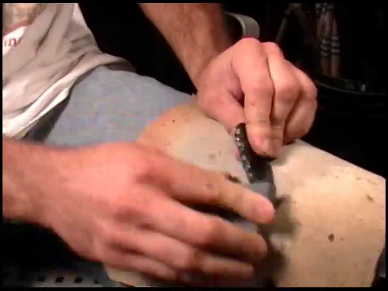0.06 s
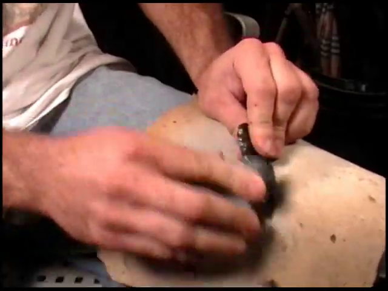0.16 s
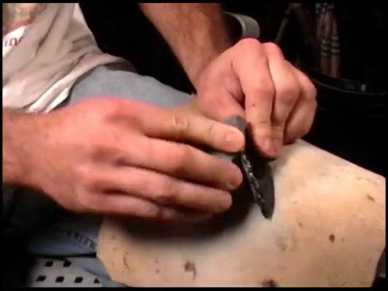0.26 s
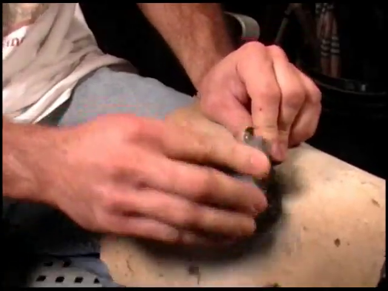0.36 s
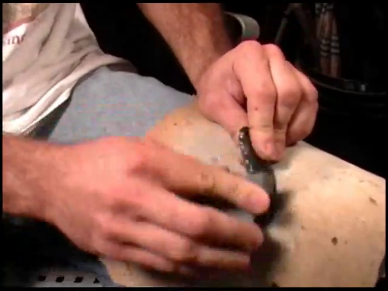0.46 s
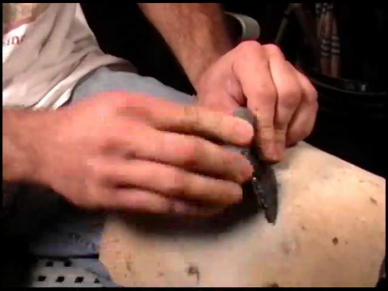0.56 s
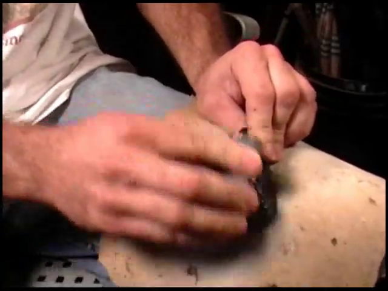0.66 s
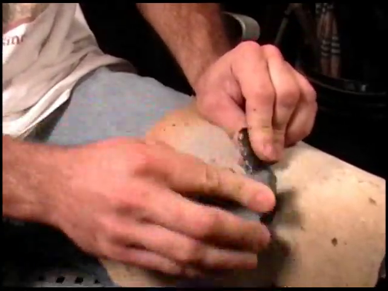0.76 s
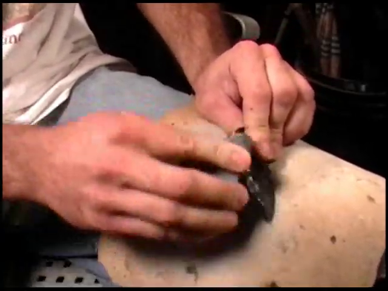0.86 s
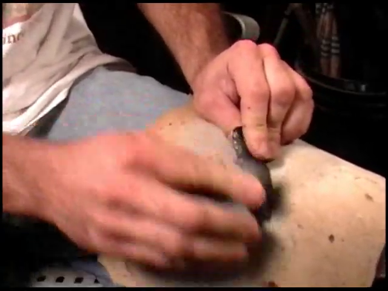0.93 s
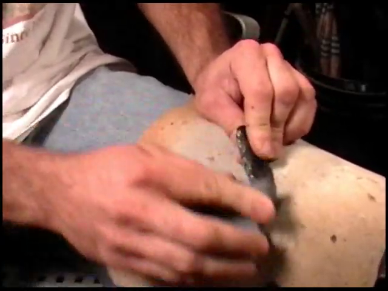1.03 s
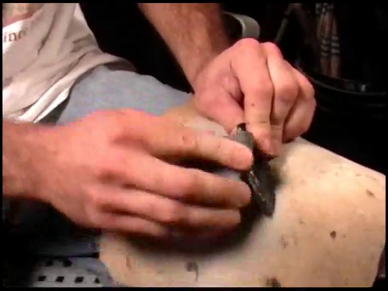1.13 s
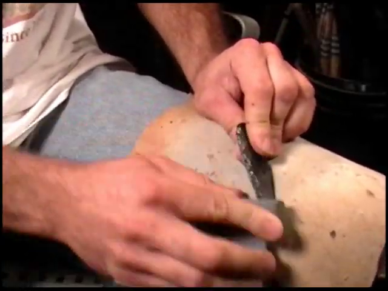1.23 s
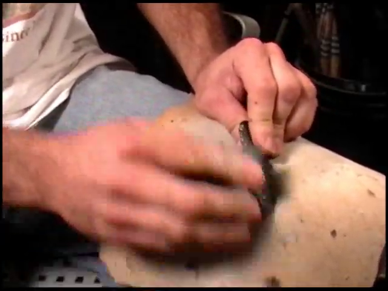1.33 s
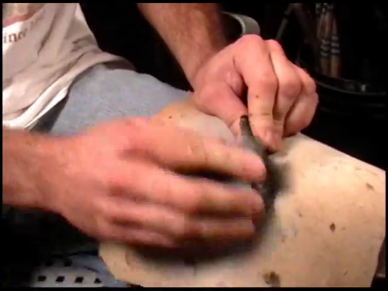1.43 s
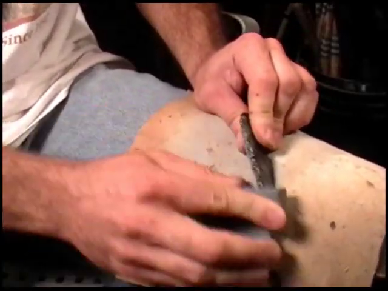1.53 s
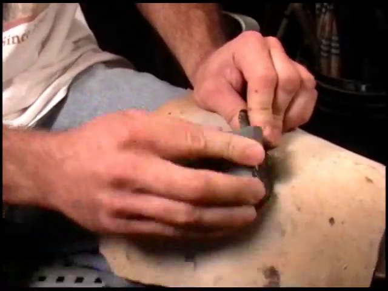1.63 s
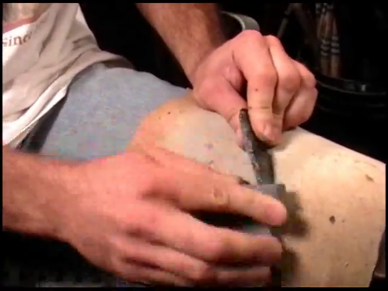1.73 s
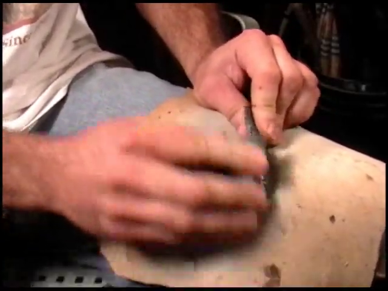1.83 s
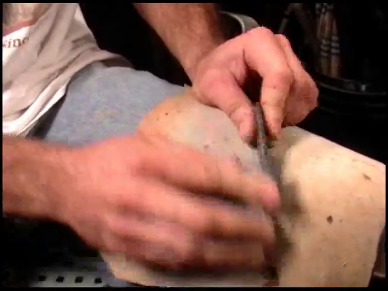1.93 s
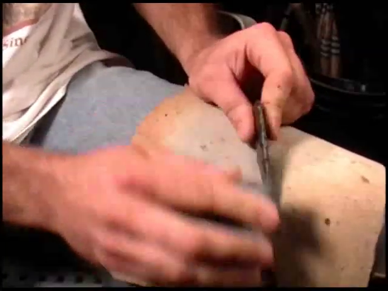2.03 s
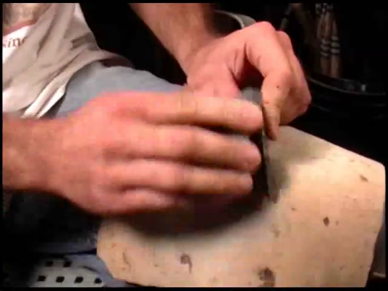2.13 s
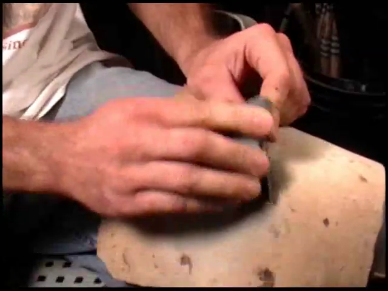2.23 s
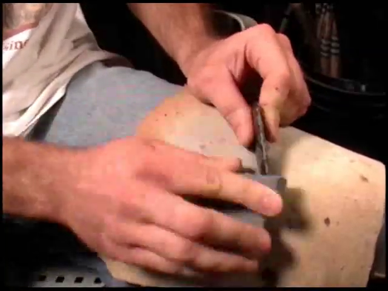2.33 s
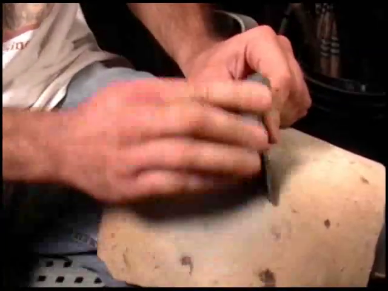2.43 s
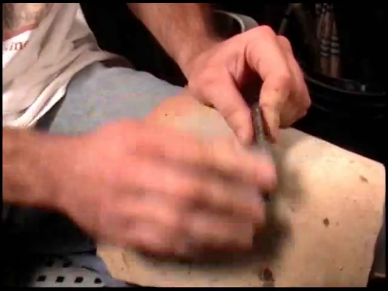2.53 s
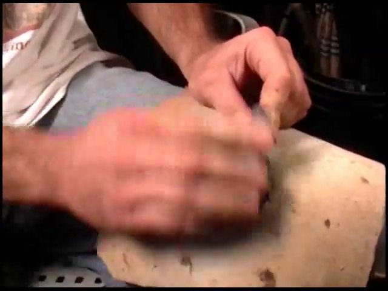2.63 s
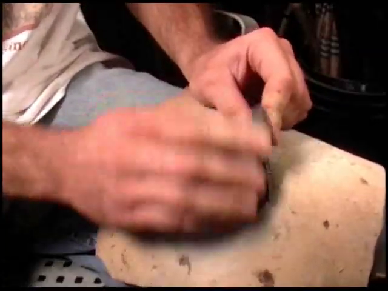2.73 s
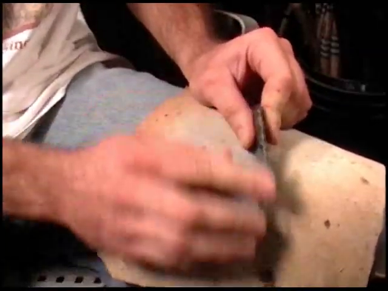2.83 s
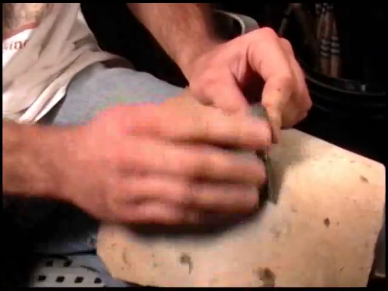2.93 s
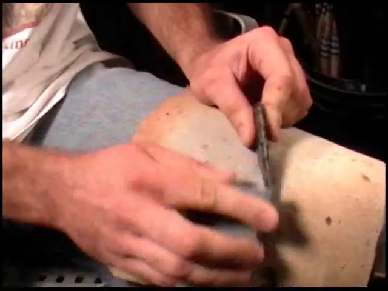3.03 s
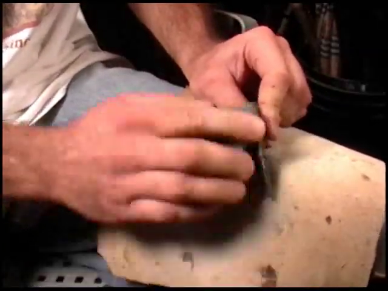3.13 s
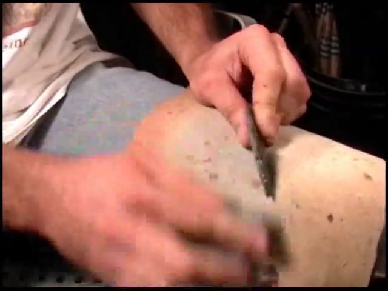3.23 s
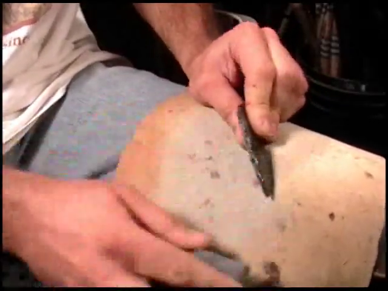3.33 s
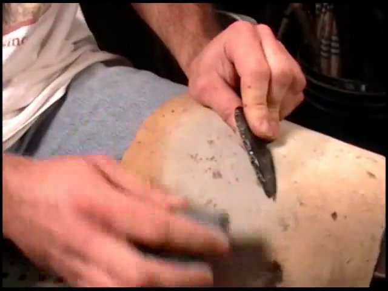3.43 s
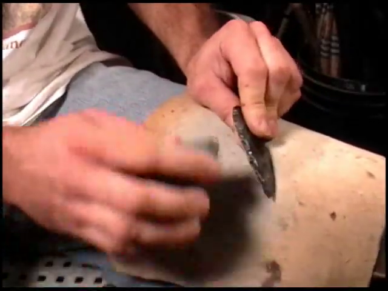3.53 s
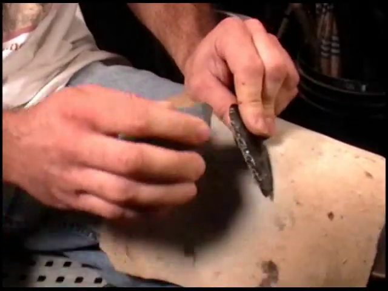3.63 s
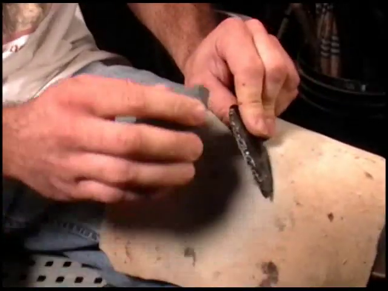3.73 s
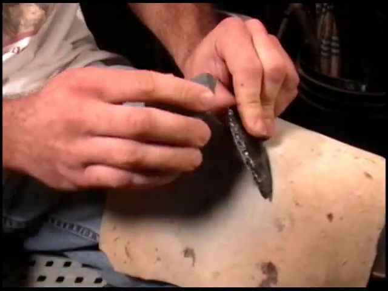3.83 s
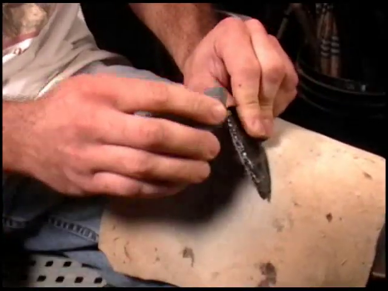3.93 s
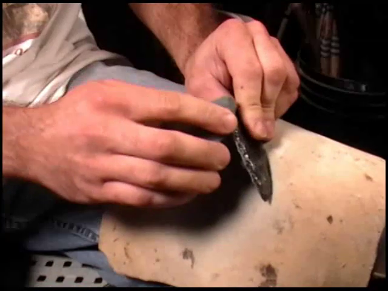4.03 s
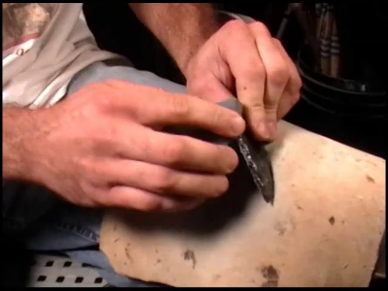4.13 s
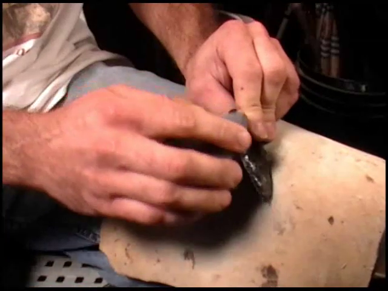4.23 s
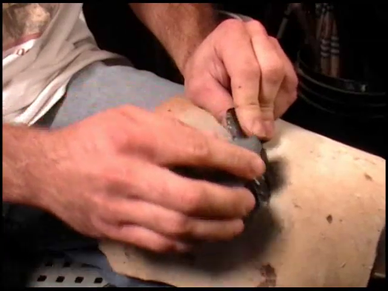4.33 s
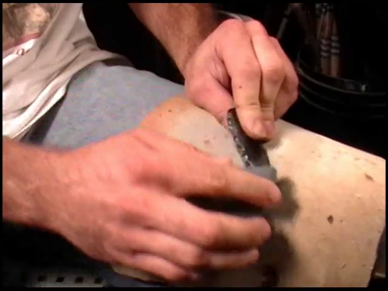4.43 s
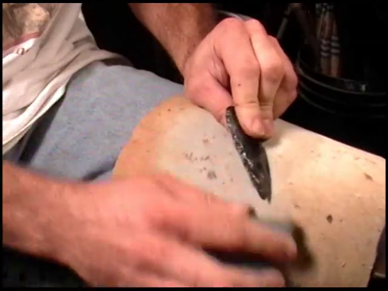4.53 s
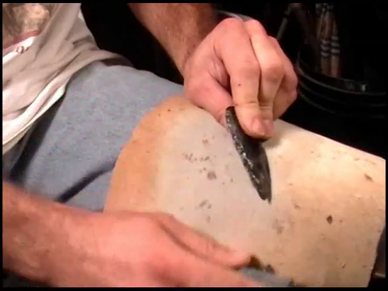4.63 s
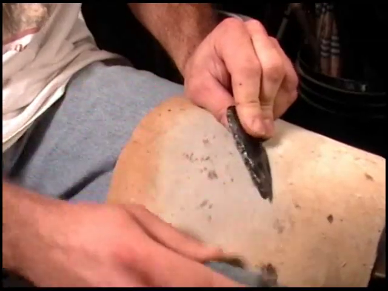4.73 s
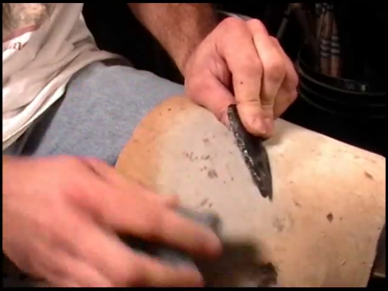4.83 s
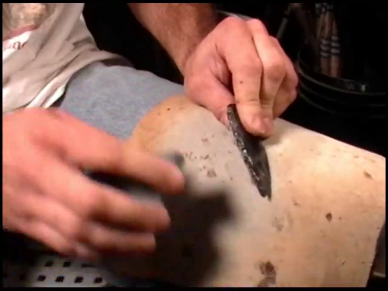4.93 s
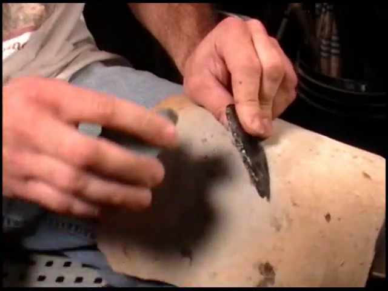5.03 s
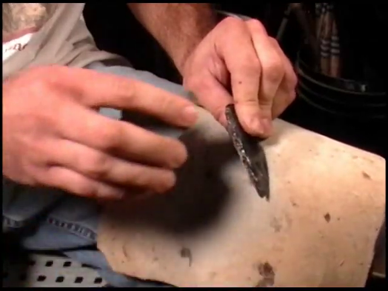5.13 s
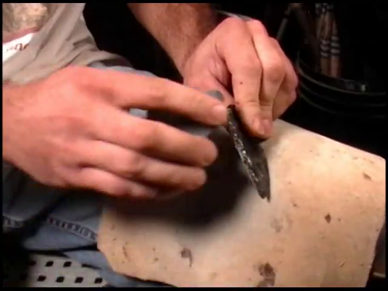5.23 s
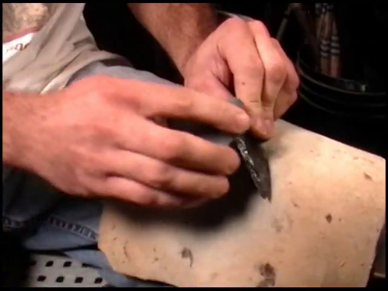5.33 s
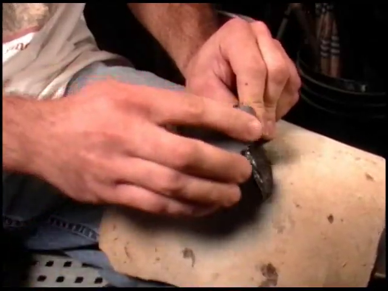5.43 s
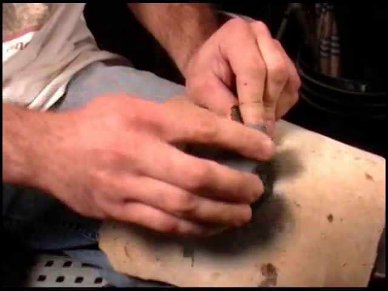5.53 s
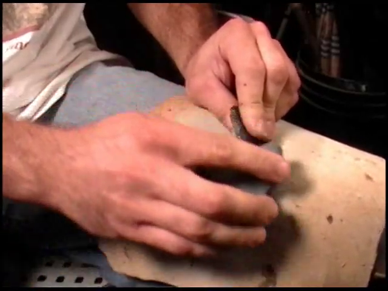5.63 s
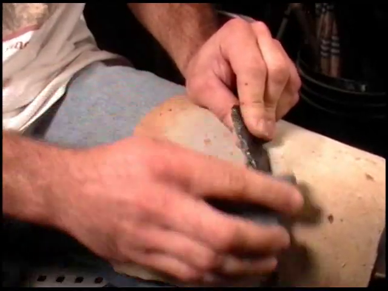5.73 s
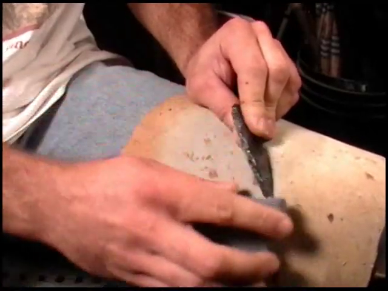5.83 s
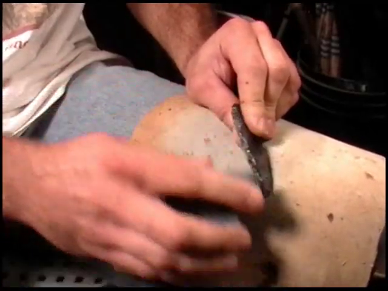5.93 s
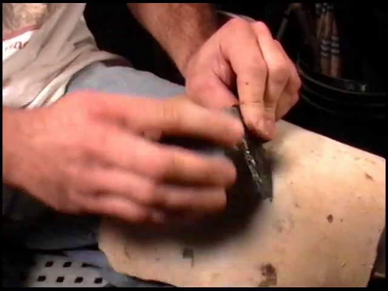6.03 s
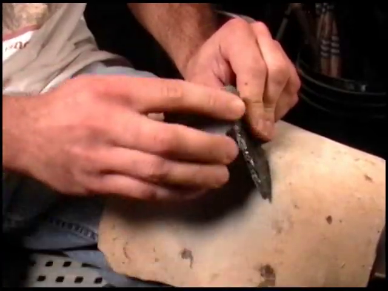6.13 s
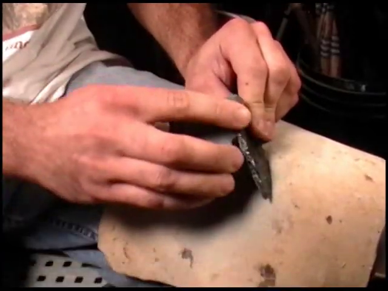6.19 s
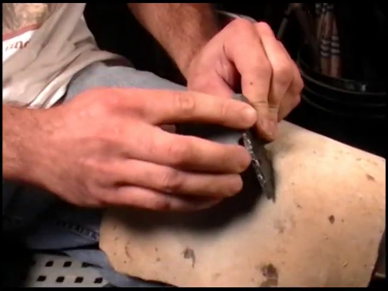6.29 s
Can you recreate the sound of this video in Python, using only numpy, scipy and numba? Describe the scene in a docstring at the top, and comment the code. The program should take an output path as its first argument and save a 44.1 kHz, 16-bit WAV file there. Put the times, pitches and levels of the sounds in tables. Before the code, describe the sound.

Close, raspy rubbing of stone on a thin stone edge, with light clicks and crunches over a faint ventilation hum.

```python
"""Abrading a stone flake

An abrader stone rubs the edge of a hand-held flake: quick back-and-forth strokes, five brisk one-way
swipes, then two slow drags. Grit catches on the edge and excites the flake's damped modes; the abrader
ticks as it lands and crunches as it snags. A sleeve rustles; a small room answers over a ventilation hum."""
import sys
import numpy as np
from scipy import signal
from scipy.fft import rfft, irfft
from scipy.io import wavfile
from scipy.ndimage import uniform_filter1d
from numba import njit

SR = 44100
rng = np.random.default_rng(int(sys.argv[2]) if len(sys.argv) > 2 else 0)


def wrap_up_sound(samples):
    """Save the sound to the file named by the first command line argument, as 16-bit audio."""
    columns = np.atleast_2d(samples).T
    # keep every value between -1 and 1, then stretch to whole-number steps
    tamed = np.clip(columns, -1, 1)
    steps = np.round(tamed * 32767).astype(np.int16)
    wavfile.write(sys.argv[1], SR, steps)


N = 280476
T = np.arange(N) / SR


def undb(db):
    """Amplitude ratio of a level in decibels."""
    return 10 ** (np.asarray(db) / 20)


def unit(x):
    """Normalisation to rms 1."""
    return x / np.sqrt(np.mean(x ** 2))


def colour(x, points):
    """Minimum-phase filtering through (frequency_hz, gain_db) points."""
    hz, db = np.transpose(points)
    size = 8192
    bins_hz = np.maximum(np.fft.rfftfreq(size, 1 / SR), 1)
    cepstrum = irfft(np.log(undb(np.interp(np.log(bins_hz), np.log(hz), db))))
    cepstrum[1:size // 2] *= 2
    cepstrum[size // 2 + 1:] = 0
    return signal.fftconvolve(x, irfft(np.exp(rfft(cepstrum))))[:len(x)]


def wander(rate_hz):
    """Random modulation of rms 1, interpolated between rate_hz values a second."""
    return unit(np.interp(T * rate_hz, np.arange(N), rng.standard_normal(N)))


def pan(x, db):
    """Stereo placement by level difference, left minus right."""
    return x * undb(np.array([[db], [-db]]) / 2)


def bell(x, centre, half_width):
    """Gaussian curve of height 1, falling to 1/e at half_width."""
    return np.exp(-((x - centre) / half_width) ** 2)


@njit
def resonate(x, hz, width_hz):
    """Damped resonance: a state-variable band-pass with gain 1 at its moving centre."""
    y, band_state, low_state = np.empty(len(x)), 0., 0.
    for i in range(len(x)):
        g, damping = np.tan(np.pi * hz[i] / SR), width_hz / hz[i]
        band = (band_state + g * (x[i] - low_state)) / (1 + g * (g + damping))
        band_state = 2 * band - band_state
        low_state += 2 * g * band
        y[i] = damping * band
    return y


def flake(force, mode_hz, where=slice(None)):
    """Modal response: the low, middle, high and top modes, damped by the fingers, each at rms 1."""
    widths_hz = 340., 770., 310., 420.
    # a second, wide pass steepens the skirts and keeps the valleys dark
    return [unit(resonate(resonate(force, hz[where], width), hz[where], 6.2 * width))
            for hz, width in zip(mode_hz, widths_hz)]


def grit(grains_per_s=9000, size_db=3.0):
    """Shot noise: grains break as dense random impulses, a few much larger than the rest."""
    hits = rng.random(N) < grains_per_s / SR
    signs = rng.choice([-1, 1], N)
    sizes = undb(size_db * np.minimum(rng.exponential(size=N), 3.5))
    return unit(hits * signs * sizes)


def skipping(rate_hz=90, unevenness=.25, decay_cycles=0.2):
    """Intermittent contact: the abrader hops in uneven bursts that each die within their cycle."""
    cycles = np.cumsum(rate_hz * (1 + unevenness * wander(60))) / SR
    return unit(np.exp(-(cycles % 1) / decay_cycles))


def lock(ring, share):
    """Amplitude limiting: friction feeds a weak ring and damps a strong one, so it sings more evenly."""
    power = uniform_filter1d(ring ** 2, SR // 400)
    return unit(ring * (np.abs(power) + .05) ** (-share / 2))


# Strokes along the edge. A spot is where (0-1) in the stroke a mode sings best; lean is the rise in level
# from start to end. Levels are relative.
# start_s, length_s, level_db, lean_db, low_db, low_spot, high_db, high_spot, rasp_db
RUBS = [(-.04, 0.13, -19.5, -6.5, 3, 0.67, 0.5, 0.45, -10.5), (.113, 0.16, -21, -1.5, -3, 0.36, 7, .6, -26),
        (.32, 0.15, -24, -7, 5.5, 0.29, 3.5, 0.06, -5), (.459, .13, -26, -10, 3.5, 0.8, 7, 0.35, -12.5),
        (.596, 0.15, -26.5, 11.5, 11.5, 0.16, -0.5, 0.57, -4),
        (.766, 0.1, -26, 2, 3.5, 0.24, 7.5, 0.65, -8.5), (.877, 0.12, -23, -0.5, 6, 0.7, 8.5, 0.18, -12.5),
        (1.012, 0.1, -24, 11.5, 7, 0.14, 9.5, 0.83, -14.5), (1.142, 0.11, -23, 5, 6, 0.34, 7.5, 0.19, -6),
        (1.257, 0.12, -22.5, -1, 5, 0.78, 10, 0.95, -8.5),
        (1.399, 0.13, -21.5, 3, 8.5, 0.31, 5, 0.11, -6.5), (1.53, 0.097, -26, 5, 6, 0.95, 8, 1, -5),
        (1.643, 0.1, -24.5, 1, 7.5, 0.55, 6, 0.92, -6.5), (1.762, 0.12, -24, -11, 7.5, 0.71, 7, 0.65, -10),
        (1.888, 0.063, -19.5, 0.5, 2, 0.31, 5.5, 0.4, -7.5)]
SWIPES = [(2.22, 0.12, -24.5, -6, 6.9, .38, 5.9, 0.5, -5.5),
          (2.468, 0.089, -22, -5, 2.2, .43, 3.1, 0.53, -11),
          (2.706, 0.079, -20, -5.5, 4.4, .3, 6.3, 0.64, -14.5),
          (2.926, 0.077, -20.5, -3, 4.5, .15, 7.5, 0.54, -14),
          (3.156, 0.071, -19, 0.5, 2.2, .4, 5.7, 0.61, -14.5)]
DRAGS = [(4.172, 0.35, -31, 10.7, 9, 0.41, 8.8, 0.1, -5.5),
         (5.378, 0.42, -34, 6.4, 10.4, 0.22, 6.9, 1, -1.5)]
# Grip and motion of each kind. end_speed: share of full speed; arch: 1 is a sine, less is flatter;
# judder: share of skipping at the start.
RUBBING = dict(low_hz=2236, middle_hz=3290, high_hz=6900, middle_db=-3.5, top_db=-6.5, middle_spot=0.56,
               top_spot=0.95, end_speed=0.0392, arch=0.71, rasp_growth_db=2.5, judder=0.069)
SWIPING = dict(low_hz=2466, middle_hz=3670, high_hz=6880, middle_db=2.5, top_db=-5.5, middle_spot=0.098,
               top_spot=0.33, end_speed=0.3, arch=0.5, rasp_growth_db=17, judder=0.1)
DRAGGING = dict(low_hz=2233, middle_hz=3220, high_hz=6980, middle_db=3, top_db=0.5, middle_spot=0.82,
                top_spot=0.46, end_speed=0.31, arch=0.25, rasp_growth_db=-4.5, judder=0.52)


def strokes():
    """Reciprocating rubs, then one-way swipes and drags, each as (row, manner, towards the tip)."""
    rubs = [(row, RUBBING, k % 2 == 0) for k, row in enumerate(RUBS)]
    return rubs + [(row, SWIPING, True) for row in SWIPES] + [(row, DRAGGING, True) for row in DRAGS]


# Frequency shift from fingers to tip, then jostling by the rough edge, as shares of each mode's frequency:
# low_share, middle_share, high_share, top_share
SLIDE_SHARES = [.02, -0.087, .018, 0.025]
JOSTLE_SHARES = [.04, .04, 0.022, 0.008]


def tuning(top_hz=11080, jostle_rate_hz=60, brisk_db=-25):
    """Boundary conditions: the grip tunes the modes; the moving contact shifts and jostles them."""
    points = []
    for (start_s, length_s, level_db, *_), manner, outward in strokes():
        held_hz = np.array([manner["low_hz"], manner["middle_hz"], manner["high_hz"], top_hz])
        for along in (.1, .9):
            place = along if outward else 1 - along
            shifted_hz = held_hz * (1 + np.array(SLIDE_SHARES) * (place - .5))
            points.append((start_s + along * length_s, undb(level_db - brisk_db), *shifted_hz))
    times_s, *columns = np.transpose(points)
    effort, *mode_hz = [np.interp(T, times_s, column) for column in columns]
    jostle = np.clip(effort, .45, 1.2)
    return [hz * (1 + share * jostle * wander(jostle_rate_hz))
            for hz, share in zip(mode_hz, JOSTLE_SHARES)]


# Gain per doubling of sliding speed: low_db, middle_db, high_db, top_db, crush_db, rasp_db
SPEED_DOUBLING_DB = [4.0, 7.4, 6, 12, 4.1, 10.2]


def stroke_envelopes(row, manner, off_spot_db=9.5, spot_width=0.37):
    """Friction noise grows with speed and pressure: speed arches over a stroke, pressure leans one way."""
    start_s, length_s, level_db, lean_db, low_db, low_spot, high_db, high_spot, rasp_db = row
    progress = (T - start_s) / length_s
    where = np.flatnonzero((progress > 0) & (progress < 1))
    along = progress[where]
    speed = manner["end_speed"] + (1 - manner["end_speed"]) * np.sin(np.pi * along) ** manner["arch"]
    pressure_db = level_db + lean_db * (along - .5)
    modes = [(low_db, low_spot), (manner["middle_db"], manner["middle_spot"]),
             (high_db, high_spot), (manner["top_db"], manner["top_spot"])]
    layers_db = [db - off_spot_db * (1 - bell(along, spot, spot_width)) for db, spot in modes]
    layers_db += [0, rasp_db + manner["rasp_growth_db"] * (along - .5)]  # crush, rasp
    gains = [undb(pressure_db + db + doubling_db * np.log2(speed))
             for db, doubling_db in zip(layers_db, SPEED_DOUBLING_DB)]
    judder = manner["judder"] * (1 - along) ** 2
    return where, np.array(gains), judder


# Spectra of crushing grit and of the coarse rasp under heavy pressure: frequency_hz, gain_db
CRUSH_SPECTRUM = [(300, -17.5), (900, -7.5), (1600, 2.5), (2900, 4.5), (4100, 1), (4800, -3), (5800, 4),
                  (7800, -0.5), (9500, -3.5), (11700, 2.5)]
RASP_SPECTRUM = [(200, -26), (500, -24), (800, -4), (1200, -1.5), (1500, 0), (2000, -9), (4000, -26.5)]


def scraping(mode_hz, chatter_db=2.5, chatter_hz=420, bite_s=0.0012, crush_db=2.5, waver_db=2.0):
    """Stick-slip friction bunches the grains dragged over the edge, and their impacts ring the flake."""
    gains, judder = np.zeros((6, N)), np.zeros(N)
    for row, manner, _ in strokes():
        where, gain, hop = stroke_envelopes(row, manner)
        gains[:, where] = np.maximum(gains[:, where], gain)
        judder[where] = hop
    pole = np.exp(-1 / (bite_s * SR))  # the abrader takes a moment to bite and to lift off
    gains = signal.lfilter([1 - pole], [1, -pole], gains)
    chatter = undb(chatter_db * unit(np.tanh(wander(chatter_hz))))
    chatter *= 1 - judder + judder * skipping()
    low, middle, high, top = flake(grit() * chatter, mode_hz)
    crush = unit(colour(grit() * chatter, CRUSH_SPECTRUM))
    rasp = unit(colour(grit() * chatter, RASP_SPECTRUM))
    # sound, level_db, pan_db; the weaker modes come and go as the contact passes their nodes
    layers = [(lock(low, share=0.19), 0, -3.2), (middle, waver_db * wander(20), -2.4),
              (lock(high, share=0.25), 0, -1.1), (top, waver_db * wander(33), -2.5),
              (crush, crush_db, -1.2), (rasp, 0, -1.1)]
    return sum(pan(sound * gain * undb(db), pan_db) for (sound, db, pan_db), gain in zip(layers, gains))


def reflections(x, t60_s, level_db, delay_s):
    """Diffuse reverberation builds after a delay and decays exponentially, widest in the treble."""
    t = np.arange(SR // 2) / SR
    fade = undb(-60 * t / t60_s) * np.clip(t / delay_s - 1, 0, 1)
    mid, side = rng.standard_normal((2, len(t))) * fade / np.sqrt(np.sum(fade ** 2))
    side = colour(side, [(500, -26.5), (2000, -4.0), (7000, -4.5)])
    return undb(level_db) * signal.fftconvolve(x, np.array([mid + side, mid - side]), axes=1)[:, :N]


def room(x):
    """Early reflections from lap, hands and floor, then the walls, which absorb the highest treble."""
    dulled = np.array([colour(channel, [(1000, 3.0), (7500, 0.5), (11000, -7.0)]) for channel in x])
    early = reflections(x, t60_s=0.16, level_db=-12.0, delay_s=0.0022)
    return early + reflections(dulled, t60_s=0.3, level_db=-15.5, delay_s=0.0047)


# Spectrum of the ventilation noise: frequency_hz, gain_db
AIR_SPECTRUM = [(25, -42), (60, -18), (105, -9.5), (165, -7.5), (270, -5.5), (400, -9.5), (550, -12),
                (1100, -14.5), (2000, -23.5), (3000, -29.5), (4200, -36.5), (12000, -52.5)]
# Tones of its hum: pitch_hz, level_db
HUM_TONES = [(59.6, -65.5), (79.5, -60), (117.5, -50), (139, -58), (193.5, -53.5), (290.7, -53.5)]


def ventilation(air_db=-43, side_db=-14, air_waver_db=2.13, drift_rad=0.6, hum_waver_db=2.4):
    """Broadband noise plus a line spectrum: soft dark air and a few wavering hum tones."""
    mid, side = (unit(colour(rng.standard_normal(N), AIR_SPECTRUM)) for _ in range(2))
    side = colour(side, [(30, -9.0), (120, 4.5), (300, -5.5), (700, 6)])
    air = mid + undb(side_db) * np.array([side, -side])
    air *= undb(air_db + air_waver_db * wander(8.5))
    hum = np.zeros(N)
    for pitch_hz, level_db in HUM_TONES:
        amplitude = np.sqrt(2) * undb(level_db + hum_waver_db * wander(6.3))
        hum += amplitude * np.sin(2 * np.pi * pitch_hz * T + drift_rad * wander(9.2))
    return pan(air, .5) + pan(hum, 1.1)


# The abrader snags on the edge with a short crunch: start_s, peak_db, treble_db, length_s
SNAGS = [(0.286, -9.5, -7, 0.0032), (.302, -10, -5.5, .0015), (0.326, -7, -22, 0.002),
         (0.336, -3, -13, 0.001), (.604, -11, -13, 0.0036), (0.622, -8.5, -26, 0.00069),
         (0.662, -5.5, -17, .0012), (0.883, -18, -10.5, 0.0015), (1.015, -13, -22, .002),
         (1.15, -9, -24, 0.0015), (1.403, -11.5, -18, 0.0041), (1.652, -9, -23, .002),
         (1.713, -5, -19, 0.0015), (1.77, -11, -11, 0.0023), (4.011, -17, -10.5, 0.0013),
         (4.041, -18, -12, 0.0028), (4.071, -14, -9, 0.0021), (4.092, -11, -28, 0.0016),
         (4.111, -16.5, -12, .0016), (4.137, -17, -22, 0.0013), (4.172, -12.5, -25, 0.006),
         (5.328, -18.5, -19, 0.0017), (5.342, -19, -13.5, 0.00064), (5.377, -14, -28, 0.0014),
         (5.411, -14, -15, 0.00061), (5.4635, -17.5, -22, 0.0013), (6.202, -19, -18, 0.0028),
         (6.223, -20.5, -15, .0017), (6.323, -16, -26, 0.0019), (6.333, -22.5, -18, 0.0056)]
# It lands on the edge with a click: start_s, peak_db, treble_db
LANDINGS = [(2.209, -0.5, -12.5), (2.468, -3, -26), (2.692, 1.5, -21), (2.921, 1.5, -17),
            (3.1423, 4.5, -11), (3.983, -10, -20), (5.3198, -6, -11), (6.1819, -6.5, -19)]


def snags_and_landings(mode_hz, blow=16.0, treble_lift_db=8, skid_db=-17, skid_s=0.058):
    """Impact excitation: a soft snag's swelling crunch or a hard landing's blow rings the flake."""
    t = np.arange(SR // 10) / SR
    out = np.zeros(N)
    landing_s, landing_hardness, snag_hardness = 0.00081, 0.76, 0.19
    contacts = [(*row, landing_s, landing_hardness) for row in LANDINGS]
    contacts += [(*row, snag_hardness) for row in SNAGS]
    for start_s, peak_db, treble_db, length_s, hardness in contacts:
        start = int(start_s * SR)
        where = slice(start, min(start + len(t), N))
        crunch = t / length_s * np.exp(1 - t / length_s)
        skid = undb(skid_db) * (1 - hardness / 2) * np.exp(-t / skid_s)
        force = (rng.standard_normal(len(t)) * (crunch + skid))[:N - start]
        force[0] += blow * hardness
        low, middle, high, top = flake(force, mode_hz, where)
        treble = undb(treble_db + treble_lift_db) * (high + undb(-4) * top)
        crush = undb(1) * unit(colour(force, CRUSH_SPECTRUM))
        tick = low + undb(-4) * middle + treble + crush
        out[where] += undb(peak_db) * tick / np.abs(tick).max()
    return pan(out, -1.7)


def swells(rows):
    """Amplitude envelope of gentle movements: a sum of Gaussian swells."""
    return sum(undb(db) * bell(T, centre_s, half_length_s) for centre_s, db, half_length_s in rows)


# The arm shifts over clothing; fingers brush stone and cloth: centre_s, level_db, half_length_s
RUSTLES = [(.63, -40.5, 0.23), (2.05, -44.5, 0.25), (2.73, -42, 0.36), (3.6, -41, 0.35), (6.3, -44, 0.78)]
BRUSHES = [(3.501, -68, 0.15), (4.79, -63, 0.068), (5.071, -73, 0.089), (6.053, -76, .1)]
# Their spectra: frequency_hz, gain_db
CLOTH_SPECTRUM = [(120, -22.5), (230, 0.5), (350, 0.5), (450, -7.5), (560, -17.5), (1000, -13.5),
                  (2500, -40), (8000, -55.5)]
BRUSH_SPECTRUM = [(500, -2), (1300, -8), (2800, 6), (4200, 5), (10000, 1), (12000, -8)]


def sleeve_and_fingers(flutter_db=2.0):
    """Light sliding friction: a dull, uneven rustle of cloth and brighter brushes of the fingers."""
    cloth = unit(colour(rng.standard_normal(N), CLOTH_SPECTRUM)) * swells(RUSTLES)
    brush = unit(colour(grit(), BRUSH_SPECTRUM)) * swells(BRUSHES)
    return pan((cloth + brush) * undb(flutter_db * wander(25)), .2)


def scene(scrape_db=-1.34):
    """Superposition of the nearby stones, their reflections, the rustling and the ventilation."""
    mode_hz = tuning()
    stones = undb(scrape_db) * scraping(mode_hz) + snags_and_landings(mode_hz)
    return stones + room(stones) + sleeve_and_fingers() + ventilation()


def record(dry, cutoff_hz=11880):
    """Soft saturation rounds the tallest peaks; a steep low-pass cuts the highest treble."""
    lowpass = signal.ellip(12, .2, 80, cutoff_hz, fs=SR, output="sos")
    return signal.sosfilt(lowpass, np.tanh(dry))


dry = scene()
out = record(dry)
wrap_up_sound(out)
```